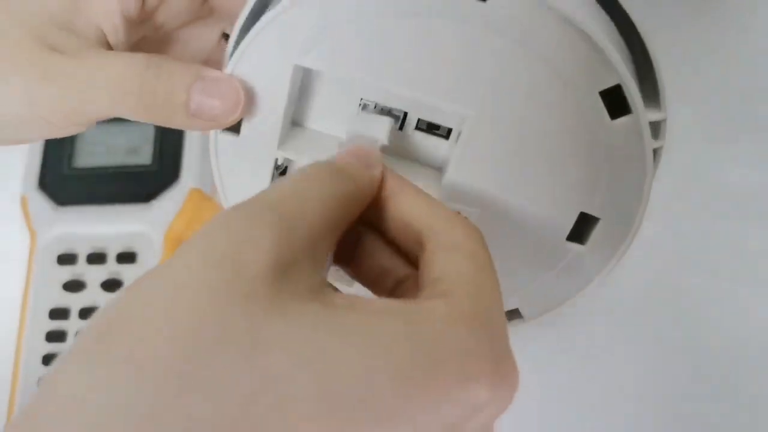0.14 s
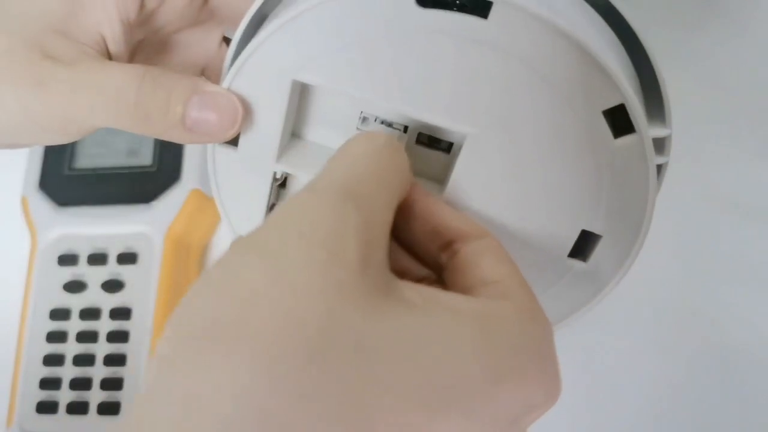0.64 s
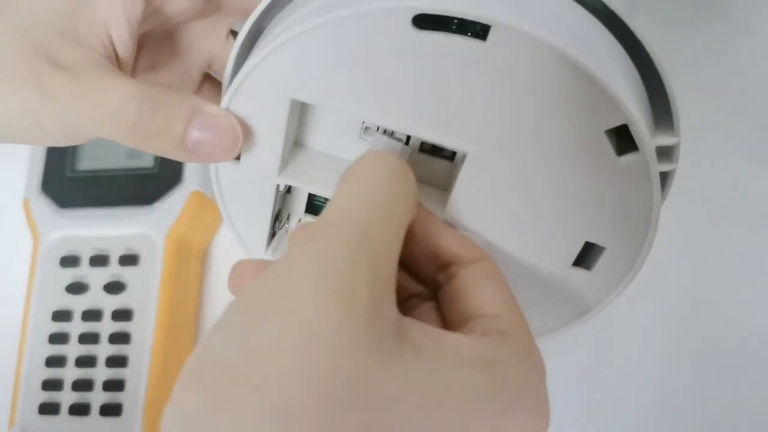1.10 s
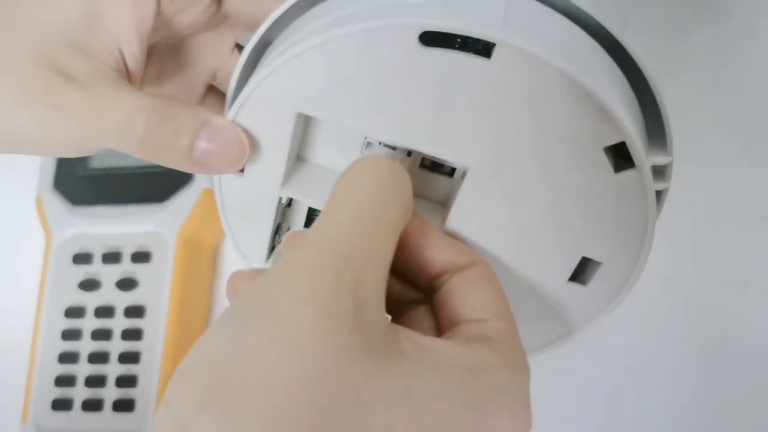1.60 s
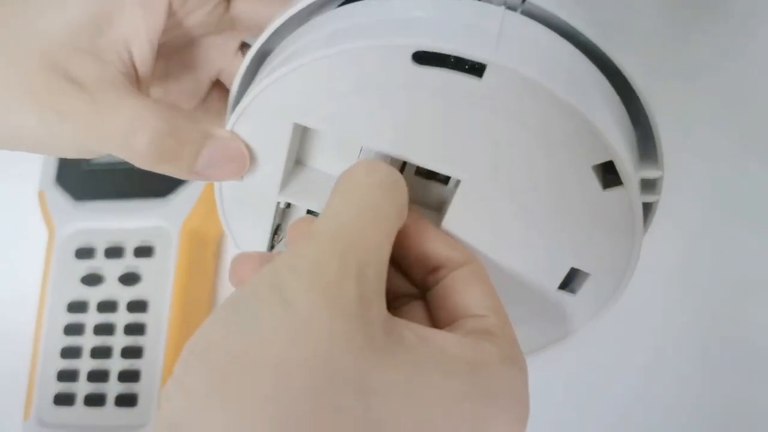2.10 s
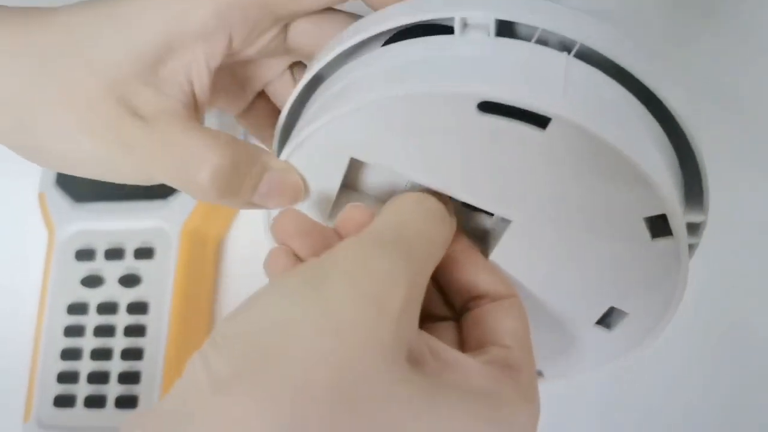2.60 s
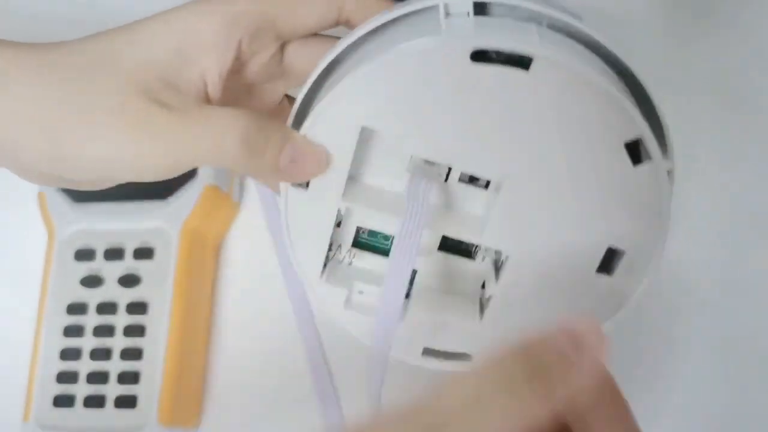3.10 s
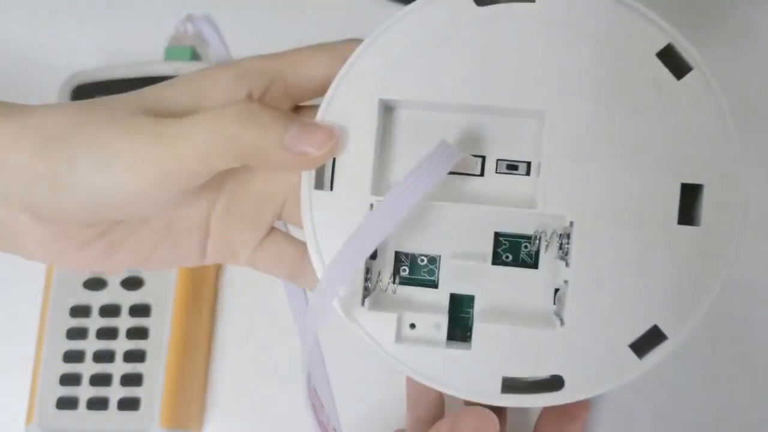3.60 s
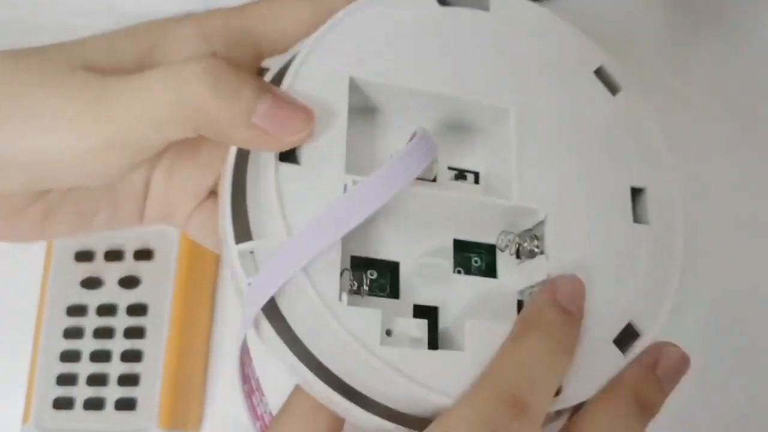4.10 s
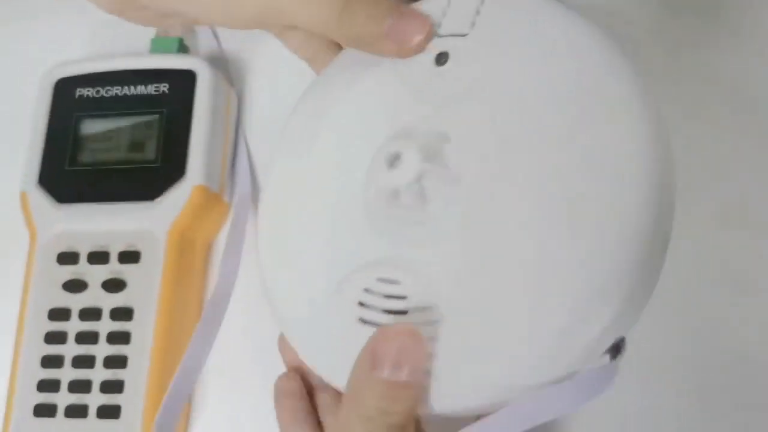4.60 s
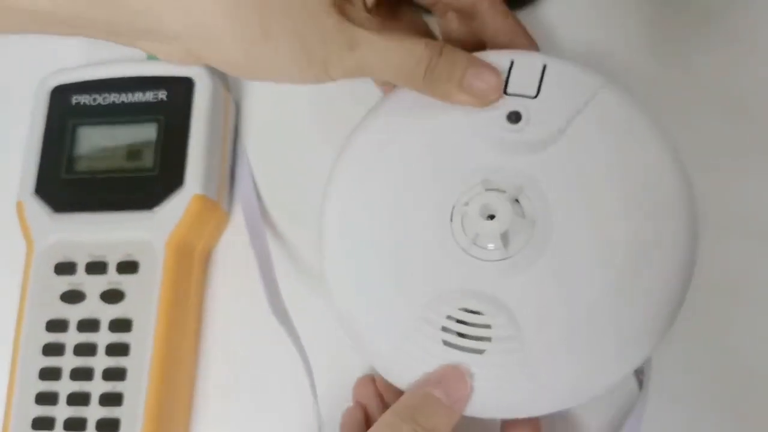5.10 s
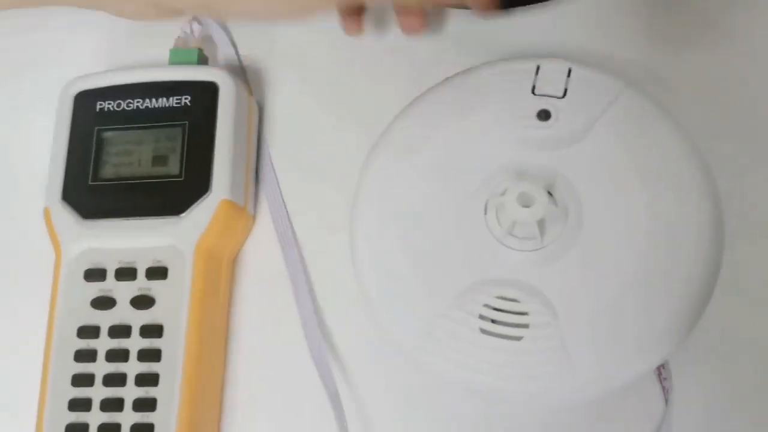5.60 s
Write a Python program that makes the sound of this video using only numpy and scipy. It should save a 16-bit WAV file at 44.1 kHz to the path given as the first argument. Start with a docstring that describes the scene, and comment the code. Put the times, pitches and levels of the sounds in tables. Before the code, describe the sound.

Hands work on a round hollow plastic device close to the microphone, indoors with little echo. Light contact ticks and a short scrape give way to near stillness, then a crisp click as the connector pushes home. Cable and skin rub and tap the shell, which lands on the desk with a solid thump. Fan rumble, hiss and a faint whine continue throughout.

```python
"""Ventilation rumbles and hisses through a small office, with a motor whine and a thin electronic whistle.
Over it fingers press a ribbon-cable plug into a round plastic housing: contacts crack and ring the shell,
skin and cable rub. The plug seats with a push that reaches the desk; the housing is turned over, then set
down on the desk, where it bounces. Noise bursts, taps and slips ring the shell's decaying sine modes;
smooth pushes ring the desk's. Two close microphone ports hear the treble differently."""
import sys
import numpy as np
from scipy import signal
from scipy.fft import rfft, irfft, next_fast_len
from scipy.io import wavfile
from scipy.ndimage import uniform_filter1d

SR = 44100
rng = np.random.default_rng(int(sys.argv[2]) if len(sys.argv) > 2 else 0)


def int16_out(signal):
    """Quantize to a 16-bit WAV file."""
    q = np.round(np.clip(np.atleast_2d(signal).T, -1, 1) * 32767)
    wavfile.write(sys.argv[1], SR, q.astype(np.int16))


def nominal_scale(level):
    """Amplitude ratio for a level in decibels (scalar or array-like)."""
    x = np.asarray(level, float) / 20
    return 10 ** x


N = 252252
T = np.arange(N) / SR

# plastic shell modes: (frequency [Hz], relative level [dB], t60 [s])
SHELL_MODES = [(757, -11.5, 0.085), (970, -16, 0.078), (1193, -2.5, 0.021), (1303, -2, 0.034),
               (1472, -2, 0.03), (1612, -5.5, 0.03), (1778, -6, 0.039), (2038, 0.5, 0.04),
               (2150, -3.5, 0.033), (2384, -3, 0.018), (2890, -35, 0.014), (4280, -33, 0.024),
               (5230, -30, 0.017)]
# small ribs that colour crackle and rubbing: (frequency [Hz], width [Hz], gain [dB])
RIB_PEAKS = [(4000, 520, 6.5), (5140, 320, 7), (9100, 1600, 4)]


def gains(points, hz):
    """Spectrum points joined on a log-frequency axis."""
    f, v = np.transpose(points)
    return np.interp(np.log(hz + 1e-9), np.log(np.maximum(f, 1)), v)


def bumps(peaks, hz):
    """Sum of resonance peaks in dB."""
    return sum(db / (1 + (2 * (hz - f) / width) ** 2) for f, width, db in peaks)


def level(x, db):
    """Scale to an rms level."""
    return x * nominal_scale(db) / np.sqrt(np.mean(x ** 2))


def peak(x, db):
    """Scale a stereo event so that its middle peaks at a level."""
    return x * nominal_scale(db) / np.max(np.abs(x.mean(axis=0)))


def walk(rate_hz):
    """Random levels held 1 / rate_hz s and slewed twice; rms near 0.8."""
    k = int(SR / rate_hz)
    held = np.repeat(rng.standard_normal(N // k + 1), k)
    return 1.11 * uniform_filter1d(uniform_filter1d(held, k), k)[:N]


def band(x, lo_hz, hi_hz):
    """Band-pass filter."""
    sos = signal.butter(2, [lo_hz, min(hi_hz, .45 * SR)], "bandpass", fs=SR, output="sos")
    return signal.sosfilt(sos, x)


def add(out, s, x):
    """Mix an event in at a time."""
    i = int(s * SR)
    out[:, i:i + x.shape[1]] += x[:, :N - i]


def ring(modes, near_hz, reach, scatter_db, spread):
    """One blow's ring: modes lose reach dB per squared octave from near_hz; the ports differ in phase."""
    onset_s = .0008
    hz, db, t60_s = np.transpose(modes)[:, :, None]
    chance = rng.standard_normal((2, len(modes), 1))
    t = T[:int(.3 * SR)]
    spot_db = -reach * np.log2(hz / near_hz) ** 2
    decay = nominal_scale(db + spot_db + scatter_db * chance[0] - 60 * t / t60_s)
    decay = decay * np.minimum(t / onset_s, 1) ** 2
    lead = np.tanh(spread * chance[1] * hz / 2000)
    phase = 2 * np.pi * hz * t
    return np.array([np.sum(decay * np.sin(phase + side * lead), axis=0) for side in (1, -1)])


def contacts():
    """Each contact: a burst of crackle in two bands, and the shell's modes struck by a tap and that burst."""
    # (time [s], crack peak [dB], sparkle peak [dB re crack], shell ring peak at 1.3-2.6 kHz [dB re crack])
    contact_events = [(0.0975, -47.5, -2, 6), (0.224, -48, -3, 7), (0.3044, -55, -2, 8), (0.556, -54, 4, 8),
                      (0.5753, -55.5, 2, 11.5), (0.632, -49, 3, -8), (0.6607, -40.5, -2.5, 1),
                      (1.921, -50.5, 1, 3), (2.358, -52, -12, -2), (2.414, -52, -14, 8.5),
                      (2.547, -45.5, -9, -8), (2.631, -58.5, -6, 19), (2.7048, -49.5, -5, 29),
                      (2.765, -42, -10, -13), (2.7736, -23.5, -6, -1), (3.0148, -47.5, 3.5, -3),
                      (3.1470, -64.5, 17, 24), (3.233, -33.5, -8, -5.5), (3.25, -43, -7, 0),
                      (3.2792, -40, 2.5, -14), (3.57, -47.5, 1.5, -10), (3.589, -48, 0, -3),
                      (3.9757, -43, -13, -1), (4.1038, -40.5, 0.5, 0.5), (4.4277, -54, -13, 15),
                      (4.45, -36.5, -7, -1), (4.538, -59, -14, 18), (4.671, -54, 3, -9),
                      (5.094, -43.5, -1.5, -3), (5.152, -46.5, -5, 2), (5.3427, -20.5, -4, 5.5),
                      (5.3578, -38.5, -1, 13)]
    crack_t60_s, crack_rise_s = 0.028, 0.00031
    spot_hz, spot_scatter_octaves = 1900, .15  # where fingers strike the shell
    out = np.zeros((2, N))
    t = T[:int(.12 * SR)]
    ribs = nominal_scale(bumps(RIB_PEAKS, np.arange(len(t) // 2 + 1) * SR / len(t)))
    fade = nominal_scale(-60 * t / crack_t60_s) * np.minimum(t / crack_rise_s, 1)
    first_instant = np.arange(len(t)) == 0
    for s, db, sparkle_db, shell_db in contact_events:
        noise = irfft(rfft(rng.standard_normal((3, len(t)))) * ribs, len(t))
        burst = (noise[:2] + 0.44 * noise[2]) * fade  # third noise is common to both ports
        crack = peak(band(band(burst, 1800, 9000), 2160, 10600), db)
        sparkle = peak(band(band(burst, 7800, 12400), 4900, 16900), db + sparkle_db)
        # a firm tap at the first instant, then the crackle keeps feeding the shell
        drive = 0.1 * burst.mean(axis=0) - 1.8 * first_instant
        near_hz = spot_hz * 2 ** (spot_scatter_octaves * rng.standard_normal())
        modes = ring(SHELL_MODES, near_hz, reach=1.2, scatter_db=3.0, spread=0.47)
        shell = signal.fftconvolve(modes, drive[None], axes=1)
        shell_peak = np.max(np.abs(band(shell.mean(axis=0), 1300, 2600)))
        add(out, s, crack + sparkle)
        add(out, s, shell * nominal_scale(db + shell_db) / shell_peak)
    return out


def rubbing():
    """Dense tiny slips, coloured by the shell, while skin or cable slides."""
    # (start [s], length [s], hiss level at let-go [dB rms], shell body [dB re hiss])
    strokes = [(0.418, 0.065, -55, -1), (2.76, 0.022, -41, 0.5), (3.135, 0.069, -50, -3),
               (3.214, 0.067, -44, -14), (3.557, .035, -61, -8), (3.965, .015, -51, -2),
               (4.173, .022, -54, -7), (4.265, 0.069, -54, 0), (4.423, 0.025, -43, 1)]
    # hiss spectrum: (frequency [Hz], relative level [dB per Hz])
    rub_colour = [(710, -4), (1200, 0.5), (1670, 1), (2030, -7), (3180, -10.5), (5090, -15.5),
                  (6440, -16.5), (15500, -20)]
    # a stroke grips, builds up while it drags, then dies away
    grip_s, build_db, let_go_t60_s = 0.0088, 5.5, 0.085
    hz = np.arange(N // 2 + 1) * SR / N
    slips = rng.standard_normal((2, N)) * nominal_scale(3.0 * walk(400))
    hiss = irfft(rfft(slips) * nominal_scale(gains(rub_colour, hz) + bumps(RIB_PEAKS, hz)), N)
    modes = ring(SHELL_MODES, 1800, reach=1.0, scatter_db=3, spread=0)
    body = signal.fftconvolve(slips, modes, axes=1)[:, :N]
    drag, press = np.zeros(N), np.zeros(N)
    for s, length_s, db, body_db in strokes:
        before = np.clip(1 - (T - s) / length_s, 0, 1)
        after_s = np.maximum(T - s - length_s, 0)
        grip = np.clip((T - s) / grip_s, 0, 1)
        stroke = grip * nominal_scale(db - build_db * before - 60 * after_s / let_go_t60_s)
        drag += stroke
        press += stroke * nominal_scale(body_db)
    return drag * level(hiss, 0) + press * level(body, 0)


def desk_pushes():
    """A half-sine push rings the desk top; the whole rim is struck, so the shell sounds its lower modes."""
    # plug seats, housing lands, bounces: (time [s], desk peak [dB], contact [ms], shell peak [dB])
    pushes = [(2.775, -28.5, 1.4, -25), (5.3437, -6.5, 1.38, -27), (5.36, -18, 1, -29)]
    # desk-top modes: (frequency [Hz], relative level [dB], t60 [s])
    desk_modes = [(140, -31, 0.24), (172, -2.5, 0.077), (205, -6, 0.24), (268, -4.5, 0.044),
                  (310.5, -7, 0.3), (380, -0.5, 0.036), (472, 2, 0.051), (620, -5, 0.071), (786, -3, 0.094),
                  (964, -8, 0.068), (1010, -5, 0.061)]
    out = np.zeros((2, N))
    for s, db, contact_ms, shell_db in pushes:
        push = np.sin(np.pi * np.minimum(T[:400] / (contact_ms / 1000), 1))
        modes = ring(desk_modes, 300, reach=0, scatter_db=1, spread=1.0)
        desk = signal.fftconvolve(modes, push[None], axes=1)
        add(out, s, peak(desk, db))
        shell = ring(SHELL_MODES, 700, reach=7.4, scatter_db=4, spread=0.69)
        # the rim touches a moment before the weight arrives
        add(out, s - .001, -peak(shell, shell_db))
    return out


def room(x):
    """A short diffuse tail of decaying noise that starts after 4 ms, duller than the direct sound."""
    room_t60_s, room_db = 0.52, -18
    t = T[:int(.4 * SR)]
    tail = rng.standard_normal((2, len(t))) * nominal_scale(-60 * t / room_t60_s) * (t > .004)
    tail = band(tail, 200, 8000)
    tail = tail / np.sqrt(np.sum(tail[0] ** 2))
    return nominal_scale(room_db) * signal.fftconvolve(x, tail, axes=1)[:, :N]


def ventilation():
    """Diffuse air noise: nearly the same at both ports in the bass, mostly unlike in the treble."""
    # spectra: (frequency [Hz], relative level [dB per Hz]); overall levels [dB rms]
    rumble, rumble_db = [(8.8, -31), (15, -44), (21, -10), (37, -8), (64, 2), (135, -8), (162, -8.5),
                         (197, -7.5), (229, -13), (296, -15), (325, -19.5), (383, -18.5), (560, -31),
                         (730, -40), (1230, -120)], -36
    air_hiss, air_hiss_db = [(280, -35), (480, -10.5), (549, -11.5), (644, -5), (756, -7.5), (875, -5),
                             (1090, -8.5), (1220, -2.5), (1300, -4.5), (1430, -12), (2540, -17),
                             (2910, -17.5), (3170, -21.5), (9000, -43), (11700, -61), (19800, -120)], -47
    # duct resonances in both: (frequency [Hz], width [Hz], gain [dB])
    duct = [(128, 22, 6), (197.6, 8.9, 2.5), (590, 17, 1), (1043, 64, 5.5), (1150, 43, -1), (1424, 90, 7),
            (1840, 89, 3), (2890, 89, 4.5)]
    # how alike the ports hear the air: (frequency [Hz], correlation [-1..1])
    likeness = [(100, 0.99), (210, 0.96), (320, 0.57), (420, 0.85), (520, -0.26), (640, 0.84), (800, 0.28),
                (1100, 0.13), (1240, -0.56), (1550, -0.061), (2000, -0.2), (2400, 0.08), (3400, 0.16),
                (5000, -0.32)]
    # port balance: (frequency [Hz], left minus right [dB])
    balance = [(60, -1), (110, 0.5), (200, -1.5), (380, -2), (700, -0.5), (1290, -2.5), (2380, 0.0),
               (4400, 5), (8120, -3), (15000, 32)]
    size = next_fast_len(N)
    hz = np.arange(size // 2 + 1) * SR / size
    like = np.clip(gains(likeness, hz), -.999, .999)
    duct_db = bumps(duct, hz)
    side_of = np.array([[1], [-1]])
    out = 0
    for colour, db, wander_db in ((rumble, rumble_db, .8), (air_hiss, air_hiss_db, .4)):
        mid, side = rfft(rng.standard_normal((2, size)))
        ports = np.sqrt(1 + like) * mid + side_of * np.sqrt(1 - like) * side
        shape = nominal_scale(gains(colour, hz) + duct_db + side_of * gains(balance, hz) / 2)
        noise = irfft(ports * shape, size)[:, :N]
        out = out + level(noise, db) * nominal_scale(wander_db * walk(3.75))
    return out


def tones():
    """Motor whine with its neighbours, and a thin whistle near the top of hearing with a fuzzy edge."""
    # (frequency [Hz], level before swell [dB rms], pitch waver [Hz per walk unit],
    #  level waver [dB per walk unit], left lead [rad])
    steady_tones = [(662, -67, 1.2, 2.2, .1), (1187, -64, .8, 3, .6), (1225, -67, .8, 2.2, .6),
                    (1890, -70, 2.5, 3, .6), (1235, -52.5, .4, 1.2, .9), (15158, -70, 9, 2.2, 1.2)]
    # slow swell: (time [s], motor whine gain [dB], whistle gain [dB])
    swell_points = [(0, 1.5, -12), (1.2, -3, -7), (2.4, 1.5, 4), (3.1, 2, 1), (4.2, 1.7, 4), (4.7, -5.5, 0),
                    (5.72, -1, 6)]
    s, whine_db, whistle_db = np.transpose(swell_points)
    out = 0
    for hz, db, waver_hz, waver_db, lead in steady_tones:
        is_whistle = hz > 5000
        phase = 2 * np.pi * np.cumsum(hz + waver_hz * walk(9 + hz / 700)) / SR
        swell_db = np.interp(T, s, whistle_db if is_whistle else whine_db)
        flutter = 1 + .22 * walk(300) * is_whistle
        size = np.sqrt(2) * nominal_scale(db + swell_db + waver_db * walk(12)) * flutter
        out = out + size * np.sin(phase + np.array([[lead], [-lead]]) / 2)
    return out


def self_noise():
    """Each microphone port's own electronic hiss: independent shaped noise."""
    # (frequency [Hz], relative level [dB per Hz])
    noise_colour = [(6000, -2.5), (10000, -4.5), (12000, -7), (14900, 1), (15600, -3.5)]
    hz = np.arange(N // 2 + 1) * SR / N
    noise = irfft(rfft(rng.standard_normal((2, N))) * nominal_scale(gains(noise_colour, hz)), N)
    return level(noise, -64.5)


def scene():
    """Handling close by, in the room, over the ventilation and tones."""
    near = contacts() + rubbing() + desk_pushes()
    return near + room(near) + ventilation() + tones()


def roll_off(x):
    """The treble ends steeply here."""
    return signal.sosfilt(signal.butter(12, 16180, fs=SR, output="sos"), x)


def record(dry):
    """The recorder adds its hiss and cuts the top with a steep low-pass."""
    top_hz = 15600
    low_pass = signal.ellip(8, .2, 60, top_hz, fs=SR, output="sos")
    mix = signal.sosfilt(low_pass, dry + self_noise())
    return roll_off(mix)


dry = scene()
out = record(dry)
int16_out(out)
```